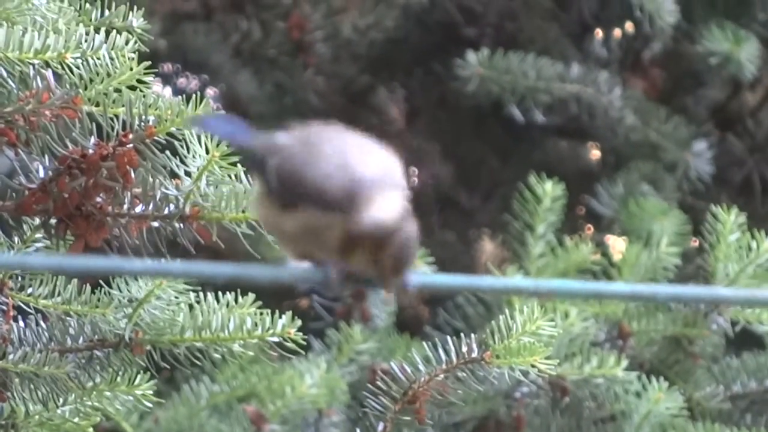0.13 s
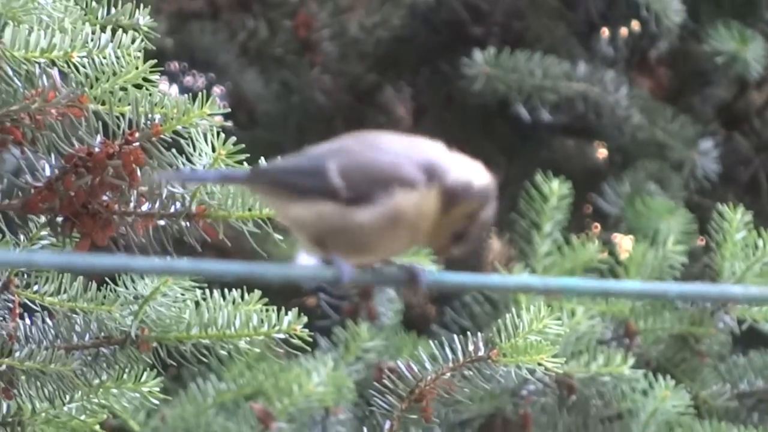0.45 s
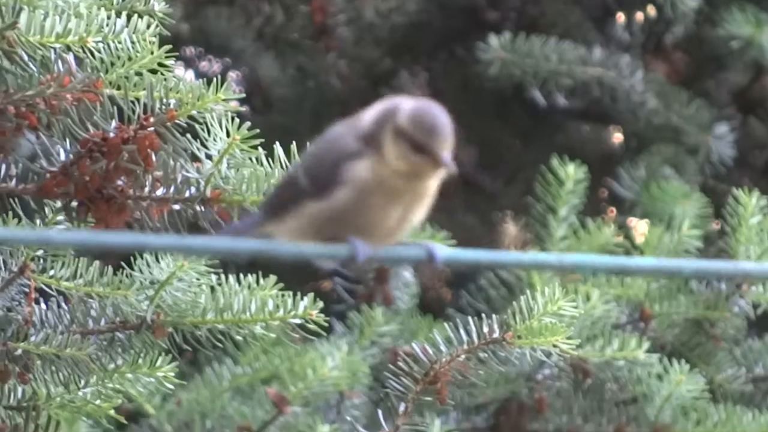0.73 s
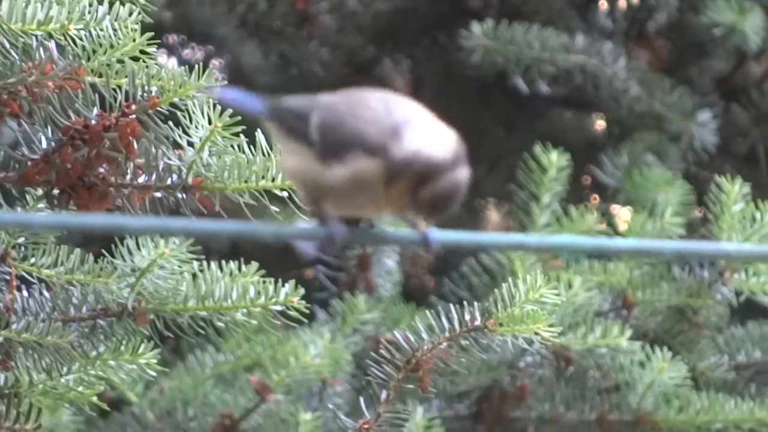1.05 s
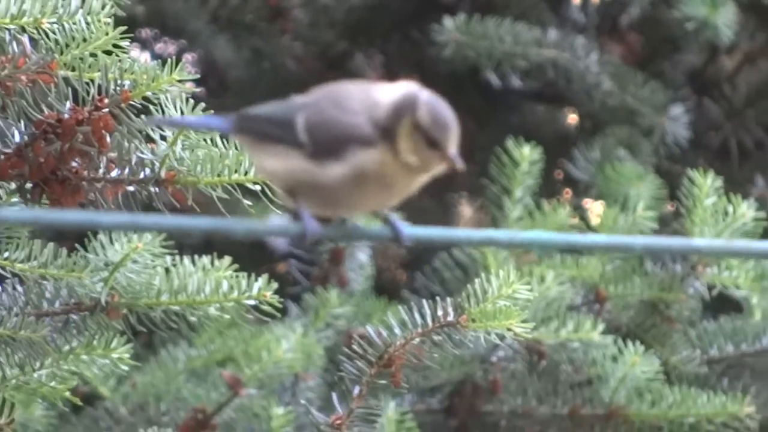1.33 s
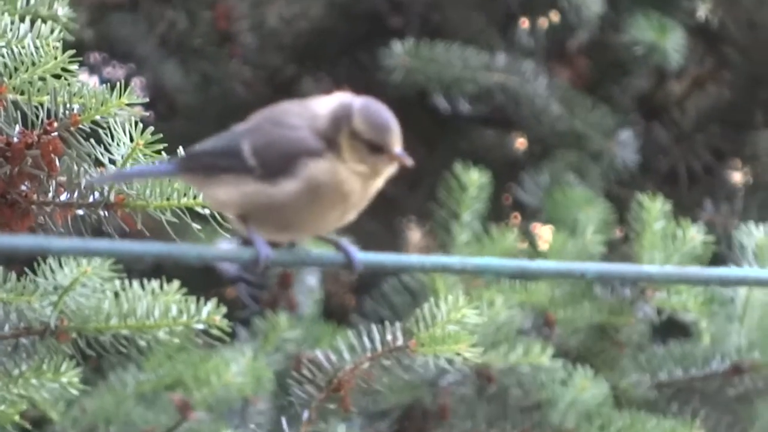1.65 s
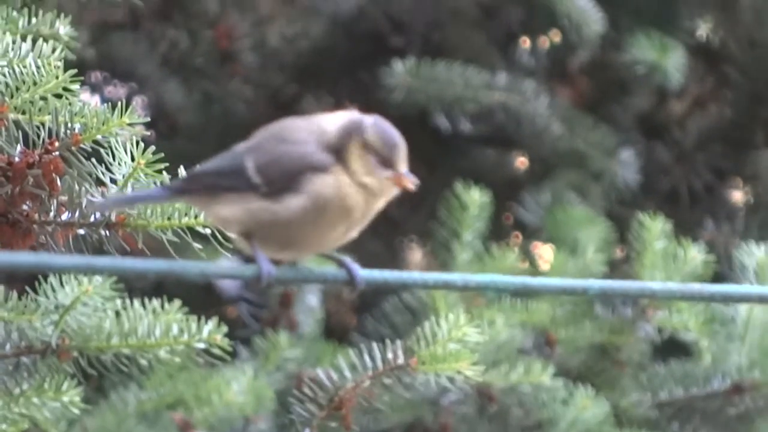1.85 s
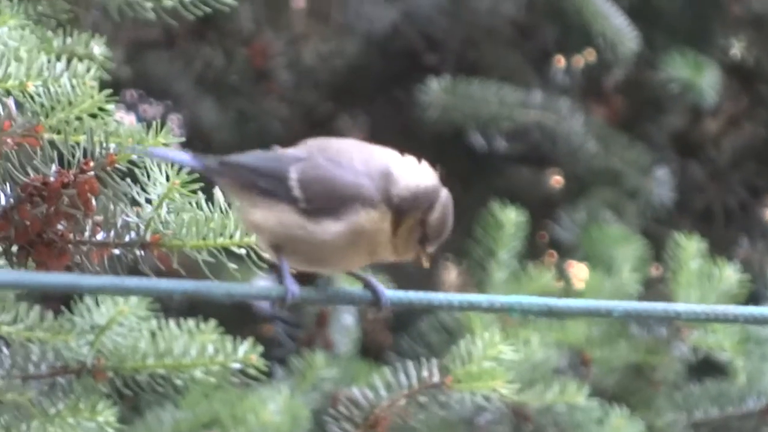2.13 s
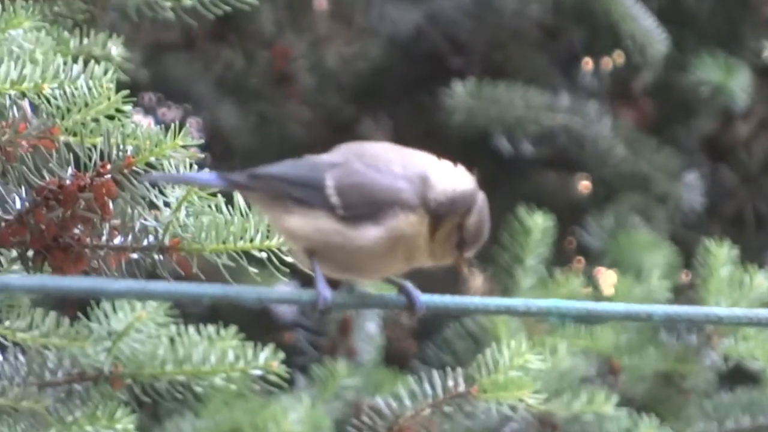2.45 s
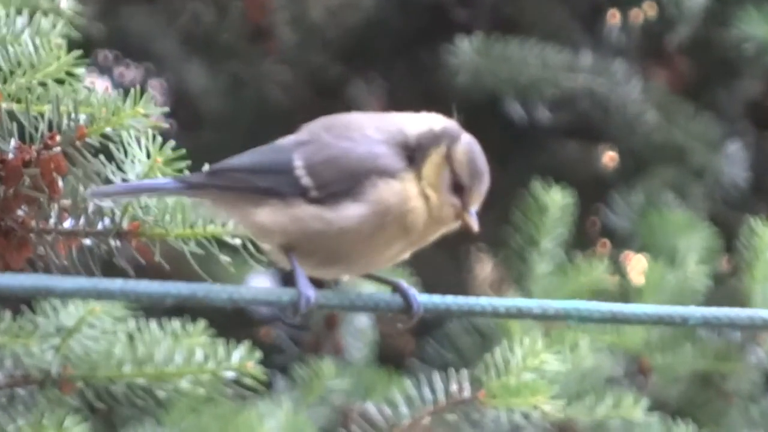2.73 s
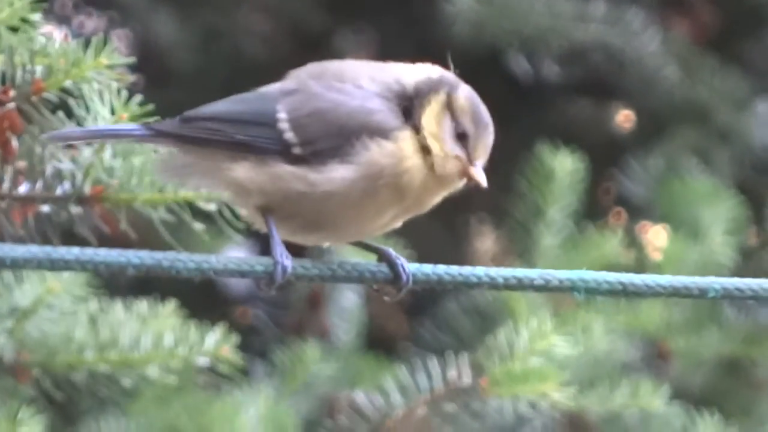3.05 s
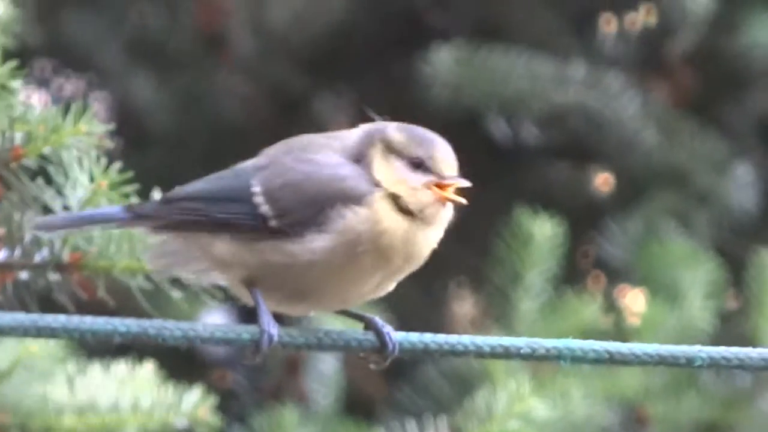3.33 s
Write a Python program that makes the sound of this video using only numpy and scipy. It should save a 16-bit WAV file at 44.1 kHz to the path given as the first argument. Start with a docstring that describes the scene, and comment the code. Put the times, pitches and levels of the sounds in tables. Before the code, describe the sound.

Fledgling birds beg with thin, very high whistled chirps and hoarse rasping calls in a garden.

```python
"""A hoarse begging call opens over a soft town hum; fledglings go on begging in a garden.
Each sings with both halves of its syrinx: two tones, with their sums and differences.
Thin whistles glide up out of a rasp; hoarse calls are lower and noisy, two shaky tones plus shaped noise.
A farther bird warbles in swept sines, a dull tick is heard once, and noise tails make the echoes."""
import sys
import numpy as np
from scipy import signal
from scipy.fft import rfft, irfft
from scipy.io import wavfile

SR = 44100
rng = np.random.default_rng(int(sys.argv[2]) if len(sys.argv) > 2 else 0)


def makeup_ratio(level_db):
    """Linear amplitude ratio for a level in decibels (20 dB per factor of ten)."""
    decades = np.asarray(level_db, float) / 20
    return 10 ** decades


def store_wav(level_fs):
    """Save 16-bit WAV to argv[1]."""
    pcm = np.round(np.clip(np.atleast_2d(level_fs), -1, 1) * 32767)
    wavfile.write(sys.argv[1], SR, pcm.T.astype(np.int16))


N = 154350  # samples, 3.5 s

# how strongly the throat passes each pitch: pitch_hz [Hz], gain_db [dB]
THROAT_GAIN = [(1200,-47),(2000,-34),(2800,-21),(4200,-13),(5500,-5),(6300,-1),(6750,3),(7250,-1),(9000,-5.5),(10500,-14),(15500,-21.5)]
FLUTTER_DB = 4.5      # usual size of the quick level changes
UPPER_JITTER = 0.018  # pitch shake as a share, for the upper hoarse voice and the warble


def rms_one(x):
    """Scales a sound to an rms of 1."""
    return x / np.sqrt(np.mean(x ** 2) + 1e-20)


def at_hz(points, hz):
    """Reads a curve of (Hz, value) points, on a log pitch scale."""
    p = np.array(points, float)
    return np.interp(np.log(np.maximum(hz, 1)), np.log(p[:, 0]), p[:, 1])


def drift(hz):
    """Random wander of rms 1: noise smoothed by two equal low-pass steps at hz."""
    r = np.exp(-2 * np.pi * hz / SR)
    settle = 2000  # samples dropped while the filter settles
    noise = rng.standard_normal(N + settle)
    return rms_one(signal.lfilter([1], [1, -2 * r, r * r], noise)[settle:])


def coloured(points):
    """White noise shaped by a spectrum of (Hz, dB) points; rms 1."""
    gain = makeup_ratio(at_hz(points, np.fft.rfftfreq(N, 1 / SR)))
    return rms_one(irfft(rfft(rng.standard_normal(N)) * gain, N))


def note(rows):
    """Gives the sample span, soft-edged gate and time-filled columns of one note table."""
    edge_s = 0.005
    s, *columns = np.transpose(rows)
    first = max(int((s[0] - edge_s) * SR), 0)
    last = min(int((s[-1] + edge_s) * SR), N)
    t = np.arange(first, last) / SR
    gate = np.clip(np.minimum(t - s[0], s[-1] - t) / edge_s + 1, 0, 1)
    span = (t * SR + 0.5).astype(int)
    return span, gate, [np.interp(t, s, c) for c in columns]


def phase(hz):
    """Adds up a changing pitch into the angle of a sine."""
    return 2 * np.pi * np.cumsum(hz) / SR


def hum():
    """Distant traffic and leaves: steady coloured noise, partly alike in both ears."""
    # colour of the hum: pitch_hz [Hz], relative_level_db [dB]
    colour = [(25,-55),(50,-16.5),(180,-15),(560,0),(850,-4.5),(3500,-10.5),(8000,-16),(13000,-19.5),(15800,-25.5)]
    # how alike the two ears are: pitch_hz [Hz], likeness [0 to 1]
    likeness = [(60,1),(1000,0.6),(10000,1)]
    level_db, sway_db, sway_hz = -54, 0.5, 1.0
    hz = np.fft.rfftfreq(N, 1 / SR)
    alike = np.clip(at_hz(likeness, hz), 0, 1)
    mid, side = rfft(rng.standard_normal((2, N))) * makeup_ratio(at_hz(colour, hz))
    both = irfft(np.sqrt(1 + alike) * mid + np.sqrt(1 - alike) * side * [[1], [-1]], N)
    ear_mean_rms = np.sqrt(np.mean(both.mean(axis=0) ** 2))
    return makeup_ratio(level_db + sway_db * drift(sway_hz)) * both / ear_mean_rms


def echoes(x, t60_s):
    """Walls and leaves scatter back a dense dying tail, a little different in each ear."""
    level_db, side_db, fade_in_s, cut_hz = -5, -13.5, 0.0037, 9800
    t = np.arange(int(SR * 0.6)) / SR
    fade = makeup_ratio(-60 * t / t60_s) * np.clip(t / fade_in_s, 0, 1)
    tails = rng.standard_normal((2, len(t))) * fade
    dull = signal.sosfilt(signal.butter(2, cut_hz, fs=SR, output="sos"), x)
    mid, side = [signal.fftconvolve(dull, h / np.sqrt(np.sum(h ** 2)))[:N] for h in tails]
    return makeup_ratio(level_db) * (mid + makeup_ratio(side_db) * side * [[1], [-1]])


def tick():
    """One dull tick: a burst of noise that dies fast, kept to an octave of pitch."""
    start_s, t60_s, centre_hz = 1.533, 0.033, 1870
    noise_db = -34.5  # at the start, before the filter
    t = np.arange(N) / SR - start_s
    burst = rng.standard_normal(N) * (t > 0) * makeup_ratio(noise_db - 60 * np.abs(t) / t60_s)
    octave = [centre_hz / np.sqrt(2), centre_hz * np.sqrt(2)]
    return signal.sosfilt(signal.butter(2, octave, "band", fs=SR, output="sos"), burst)


def warble():
    """A farther bird: swept sines whose pitch shakes and whose level flutters."""
    # one table a note: time_s [s], pitch_hz [Hz], level_db [dB rms], both before shake and flutter
    notes = [
        [(0,2130,-48),(.035,2220,-52)],
        [(.488,2905,-50.5),(.503,4400,-42),(.516,4050,-44),(.535,2970,-44.5)],
        [(.543,3000,-41),(.562,3990,-47),(.582,3114,-44.5),(.603,2700,-50.5)],
        [(3.308,3670,-46),(3.325,2640,-53.5)],
        [(3.374,3516,-34),(3.392,2620,-54)],
        [(3.437,3970,-45.5),(3.448,3260,-35),(3.462,2360,-57.5)],
    ]
    out, shake, flutter = np.zeros(N), drift(400), drift(166)
    for rows in notes:
        i, gate, (hz, db) = note(rows)
        tone = np.sin(phase(hz * (1 + UPPER_JITTER * shake[i])))
        out[i] += gate * np.sqrt(2) * makeup_ratio(db + FLUTTER_DB * flutter[i]) * tone
    return out


def hoarse():
    """Two shaky low tones, rich in sums, and a rasp; the throat shapes the tones and the usual rasp."""
    # one table a call: time_s [s], lower_hz [Hz], upper_hz [Hz],
    # level_db [dB, before shake, throat and flutter]
    calls = [
        [(0,2765,3710,-48),(.014,2720,3220,-43.5)],
        [(.488,3450,4010,-48),(.515,2952,3920,-45.5),(.555,2870,4010,-45.5),(.568,2560,3870,-49)],
        [(.95,2250,2690,-61),(.965,2270,2950,-43),(.99,2870,4050,-41.5),(1.005,2625,3880,-46)],
        [(1.082,1766,2900,-43),(1.105,2597,3726,-39.5),(1.125,2437,3870,-40),(1.142,2920,3660,-45.5)],
        [(2.06,2500,3835,-48.5),(2.1,2907,3835,-42.5),(2.155,2887,3890,-42),(2.178,2350,3740,-48.5)],
        [(2.41,2096,2470,-48.5),(2.44,2260,2750,-39),(2.48,2300,2940,-44.5)],
        [(2.51,2020,2392,-47.5),(2.545,2113,2507,-36),(2.566,2140,2760,-39.5)],
        [(2.648,2070,2600,-42.5),(2.688,2510,3080,-34.5),(2.714,2570,3130,-45)],
        [(2.758,1867,2484,-43),(2.787,2686,3900,-36),(2.815,2720,4010,-47)],
        [(2.865,2078,2656,-49),(2.882,2278,2610,-32),(2.897,2240,2730,-40)],
        [(2.9,1927,6600,-34.5),(2.925,2683,12900,-36)],
        [(3.13,2070,2690,-41),(3.162,2750,3530,-40.5)],
        [(3.228,2260,2700,-43.5),(3.28,3110,4320,-40.5)],
        [(3.335,2098,3000,-37),(3.358,1793,2900,-41),(3.372,2443,3046,-38),(3.386,2530,2980,-36.5),(3.402,2174,2710,-37)],
        [(3.482,2510,3300,-49),(3.5,2600,3510,-39.5)],
    ]
    # rasp of each call above its table level: rasp_db [dB]
    rasp_levels = [3, 2, -5, -7, 3, 0, 0, -1, 2, -2, -1, -3, 1, -1, 3]
    # partials: times_lower [count], times_upper [count]
    partials = [(1, 0), (0, 1), (2, 0), (1, 1), (3, 0), (2, 1), (4, 0)]
    # level of each partial before the throat: partial_db [dB]
    partial_levels = [7, 2.5, 4.5, -1, -6, -11.5, -5]
    # calls with weak sums and an airy rasp: call_number [from 0]
    thin_calls = (2, 3)
    # colour of the airy rasp: pitch_hz [Hz], relative_level_db [dB]
    airy_colour = [(3000, -12), (5000, 3), (15000, -6)]
    lower_jitter, thin_sums_db, rasp_flutter_share = 0.013, -10, 0.5
    out = np.zeros(N)
    rasp = coloured(THROAT_GAIN) * makeup_ratio(rasp_flutter_share * FLUTTER_DB * drift(75))
    lower_shake, upper_shake = drift(430), drift(173)
    flutters = [drift(165) for _ in partials]
    airy = coloured(airy_colour)
    for call, (rows, rasp_db) in enumerate(zip(calls, rasp_levels)):
        i, gate, (hz1, hz2, db) = note(rows)
        thin = call in thin_calls
        a = phase(hz1 * (1 + lower_jitter * lower_shake[i]))
        b = phase(hz2 * (1 + UPPER_JITTER * upper_shake[i]))
        tone = np.zeros(len(i))
        for (m, n), partial_db, flutter in zip(partials, partial_levels, flutters):
            weaker_db = thin_sums_db * (m * n > 0 and thin)
            throat_db = at_hz(THROAT_GAIN, m * hz1 + n * hz2)
            level = makeup_ratio(partial_db + weaker_db + throat_db + FLUTTER_DB * flutter[i])
            tone += level * np.sin(m * a + n * b)
        breath = (airy if thin else rasp)[i]
        out[i] += gate * (np.sqrt(2) * makeup_ratio(db) * tone + makeup_ratio(db + rasp_db) * breath)
    return out


def whistles():
    """Two clean tones with faint sums and differences; they glide up out of a rasp."""
    # one table a whistle: time_s [s], lower_hz [Hz], lower_db [dB rms], upper_hz [Hz], upper_db [dB rms],
    # pitches before shake and levels before flutter
    calls = [
        [(.108,6500,-29,7450,-46),(.126,6700,-29,7830,-32),(.14,6340,-39,8200,-44)],
        [(.232,6640,-34,8000,-32),(.242,6840,-30,8140,-32.5),(.265,6575,-24.5,8000,-33.5),(.29,6750,-26.5,8220,-39),(.305,6760,-35,8170,-38)],
        [(.46,6670,-67,8250,-64),(.474,6200,-41,8430,-47)],
        [(1.296,5840,-35.5,7600,-37),(1.31,6730,-33.5,8075,-33),(1.335,6460,-37.5,8115,-32.5)],
        [(1.612,6400,-39,8300,-41),(1.622,6980,-31,8440,-28.5),(1.638,6990,-34,8700,-33),(1.65,6760,-36.5,8300,-32)],
        [(1.727,6780,-36,8770,-27.5),(1.736,7130,-39,9140,-39),(1.758,7080,-42,8890,-32.5),(1.768,7230,-31,8700,-22.5),(1.793,7040,-28.5,8510,-28)],
        [(1.893,6750,-32,8310,-30.5),(1.945,6840,-27,8090,-26.5),(1.965,6580,-26,7990,-39)],
        [(2.385,7060,-54,8330,-51),(2.4,7150,-46,8360,-49),(2.435,6830,-41.5,8160,-38),(2.485,6580,-40,7900,-39.5)],
        [(2.562,6700,-43,8110,-37),(2.586,6550,-38.5,7960,-40.5),(2.645,6200,-43,7880,-54)],
        [(2.722,6200,-44,8040,-40),(2.746,6230,-37,8300,-56)],
        [(3.012,6540,-37,7700,-49),(3.021,6613,-20,7500,-43),(3.04,6630,-22,7880,-31)],
        [(3.128,6750,-38,8290,-27),(3.142,6900,-31,8130,-23),(3.16,7090,-39,8180,-32),(3.172,6790,-24.5,7960,-23.5),(3.205,6780,-38,8030,-32)],
        [(3.297,6400,-37,7830,-41),(3.305,6480,-34.5,7850,-40),(3.325,6220,-33.5,7640,-32.5)],
    ]
    # time step of each opening glide, used twice over: glide_s [s]
    glide_steps = [.02, .012, .003, .026, .008, .008, .008, .008, .004, .004, .014, .007, .006]
    # peak of the rasp around each opening glide: rasp_db [dB]
    glide_rasps = [-37.5, -39, -52, -39, -40.5, -58, -45, -54, -62, -55, -29.5, -35, -33.5]
    # faint extra tones: times_lower [count], times_upper [count]
    mixes = [(-1, 2), (2, 0), (1, 1)]
    # offset added to the followed voice levels: mix_db [dB]
    mix_levels = [-31.5, -33, -36]
    # whistles that end in a fall: call_number [from 0]
    falling = (2, 12)
    jitter, flutter_db, steady_rasp_db = 0.005, 0.3 * FLUTTER_DB, -31
    glide_share, glide_loss_db = 0.31, 15.5  # drop in pitch and level one step before the whistle
    fall_s, fall_share = 0.017, 0.43
    mix_follows = 0.68  # share of the voices' dB swing

    def moved(row, later_s, pitch_share, loss_db):
        """Copies a row at another time, with both voices lower and softer."""
        return row * [1, pitch_share, 1, pitch_share, 1] + [later_s, 0, -loss_db, 0, -loss_db]

    out, rasp = np.zeros(N), coloured(THROAT_GAIN)
    lower_shake, upper_shake = drift(174), drift(170)
    lower_flutter, upper_flutter = drift(51), drift(71)
    for call, (rows, up, rasp_db) in enumerate(zip(calls, glide_steps, glide_rasps)):
        rows = np.array(rows, float)
        first, last = rows[0], rows[-1]
        glide = [moved(first, -2 * up, 1 - glide_share, glide_loss_db + 20),
                 moved(first, -up, 1 - glide_share, glide_loss_db),
                 moved(first, -up / 2, 1 - glide_share / 3, glide_loss_db / 2)]
        fall = []
        if call in falling:
            fall = [moved(last, 0.49 * fall_s, 0.9, 3), moved(last, fall_s, 1 - fall_share, 12)]
        i, gate, (hz1, db1, hz2, db2) = note(np.vstack(glide + [rows] + fall))
        a = phase(hz1 * (1 + jitter * lower_shake[i]))
        b = phase(hz2 * (1 + jitter * upper_shake[i]))
        db1 = db1 + flutter_db * lower_flutter[i]
        db2 = db2 + flutter_db * upper_flutter[i]
        tone = makeup_ratio(db1) * np.sin(a) + makeup_ratio(db2) * np.sin(b)
        for (m, n), mix_db in zip(mixes, mix_levels):
            voices_db = (abs(m) * db1 + abs(n) * db2) / (abs(m) + abs(n))
            tone += makeup_ratio(mix_follows * voices_db + mix_db) * np.sin(m * a + n * b)
        # the opening rasp swells and fades as half a sine around the glide
        swell = np.sin(np.pi * np.clip((i / SR - first[0] + 1.74 * up) / (2.46 * up), 0, 1))
        rasp_level = makeup_ratio(rasp_db) * swell + makeup_ratio(np.maximum(db1, db2) + steady_rasp_db)
        out[i] += gate * (np.sqrt(2) * tone + rasp[i] * rasp_level)
    return out


def scene():
    """Near birds lean to the right, far sounds sit in the middle; both echo over the hum."""
    pan_db, far_echo_db = 0.75, 3  # the far echo gain comes on top of the echo level
    near = whistles() + hoarse()
    far = warble() + tick()
    near_sound = near * makeup_ratio([[-pan_db], [pan_db]]) + echoes(near, t60_s=0.26)
    far_sound = far + makeup_ratio(far_echo_db) * echoes(far, t60_s=0.49)
    return near_sound + far_sound + hum()


def top_cut(x):
    """Nothing passes above about 15.9 kHz."""
    return signal.sosfilt(signal.butter(12, 15910, fs=SR, output="sos"), x)


def record(dry):
    """A steep low-pass filter takes off the highest treble."""
    low_pass = signal.butter(10, 15400, fs=SR, output="sos")  # Hz
    mix = signal.sosfilt(low_pass, dry)
    return top_cut(mix)


dry = scene()
out = record(dry)
store_wav(out)
```